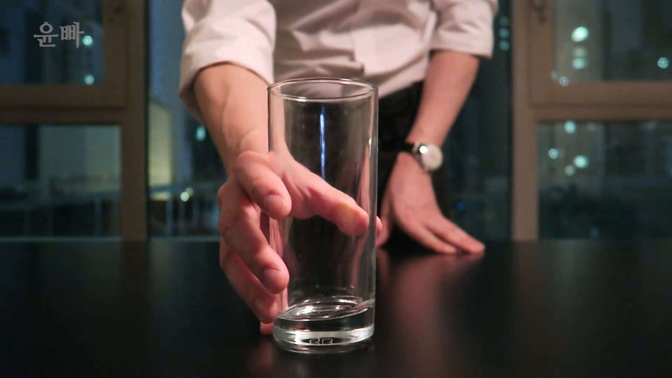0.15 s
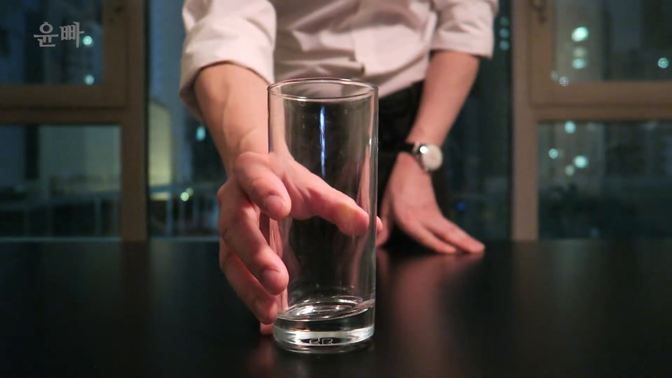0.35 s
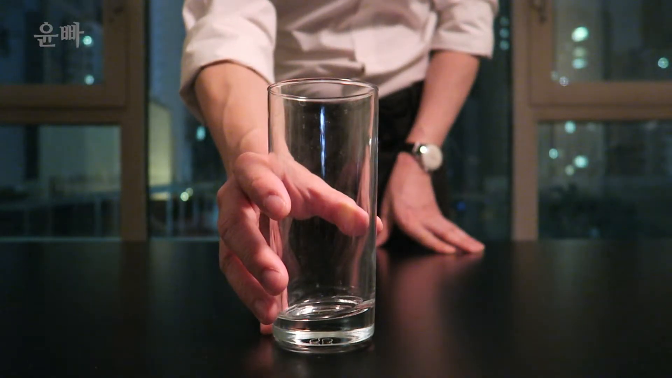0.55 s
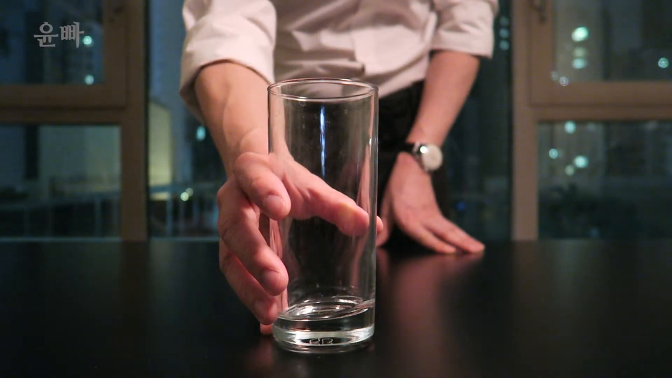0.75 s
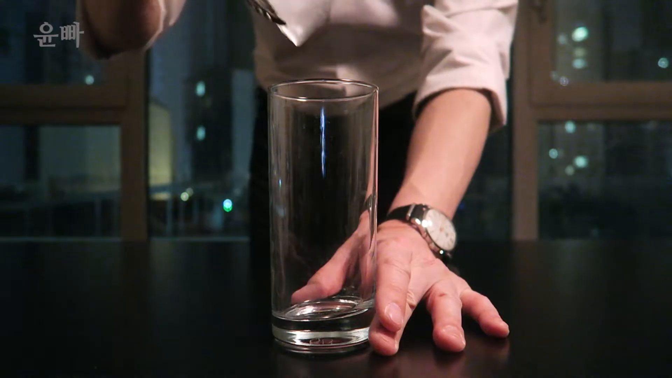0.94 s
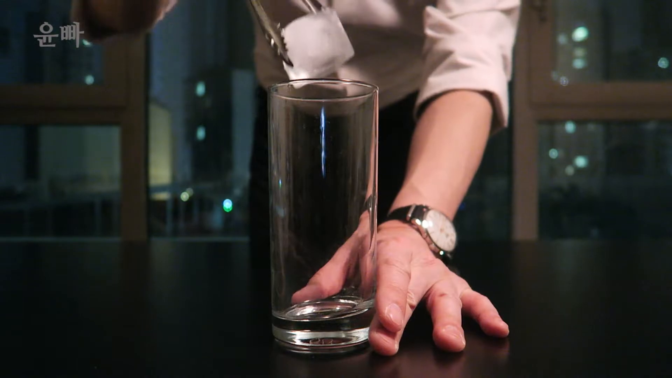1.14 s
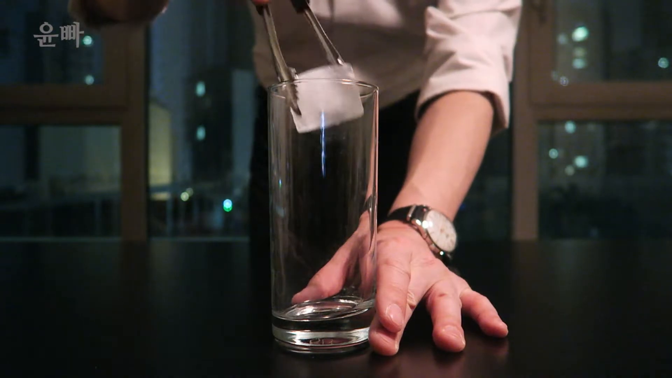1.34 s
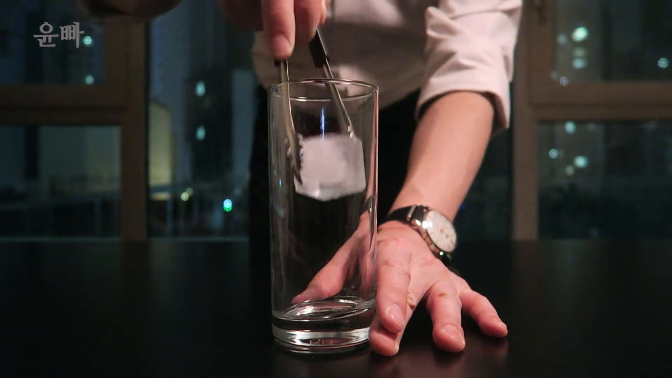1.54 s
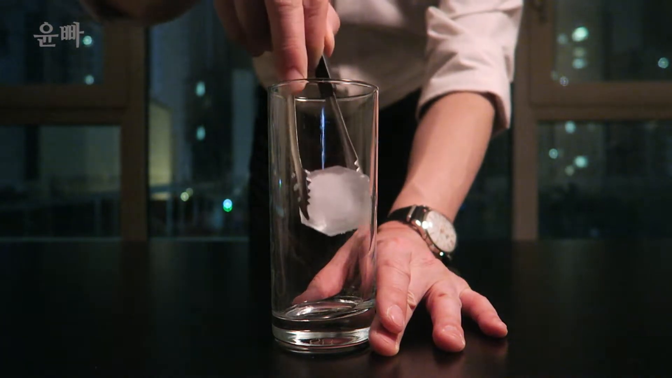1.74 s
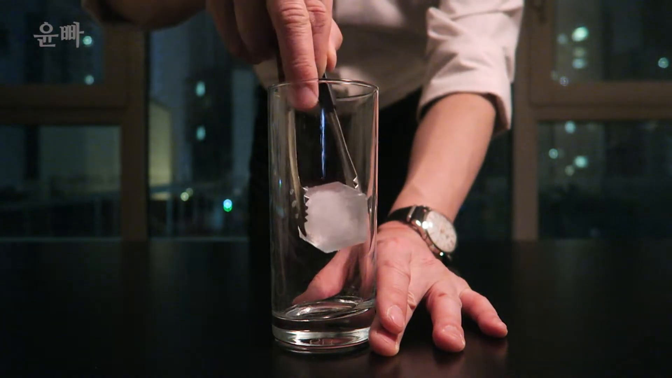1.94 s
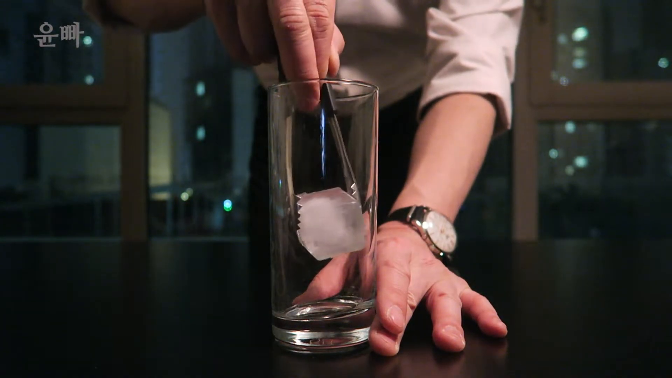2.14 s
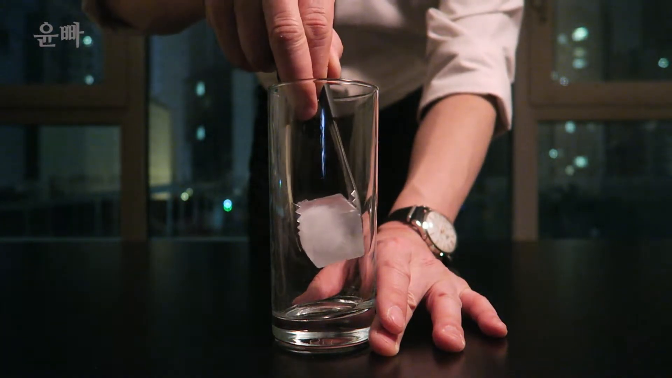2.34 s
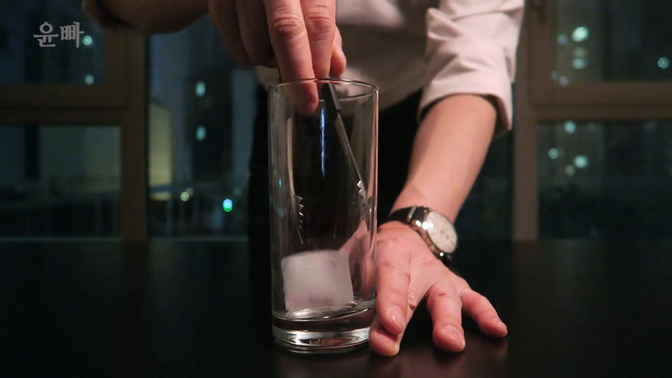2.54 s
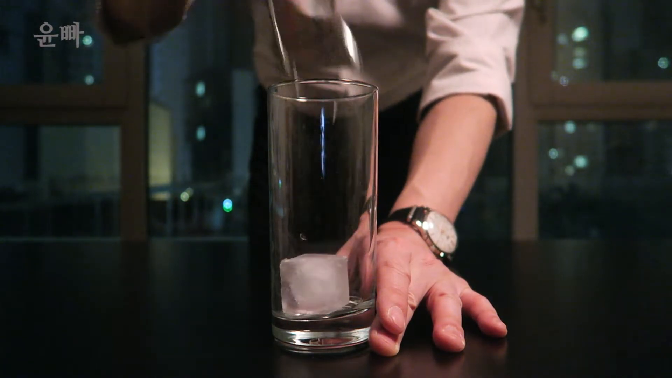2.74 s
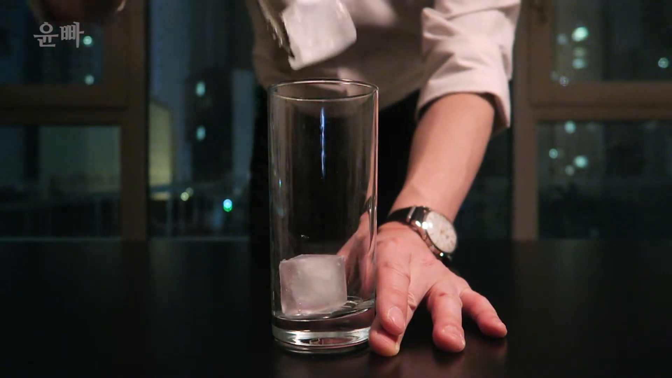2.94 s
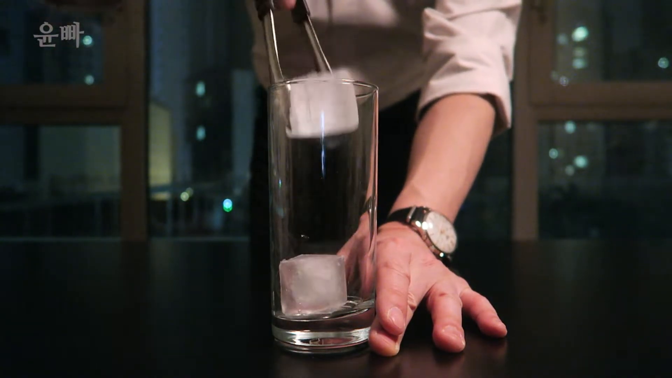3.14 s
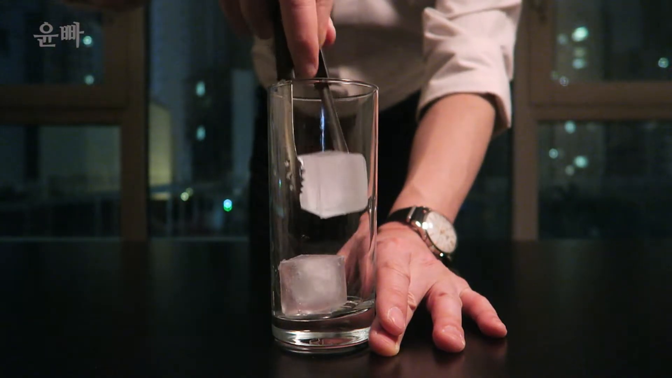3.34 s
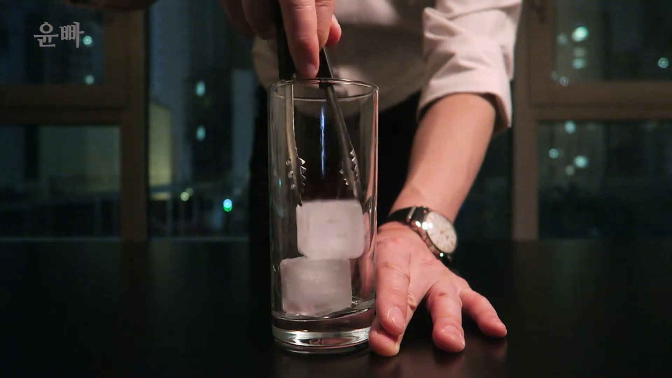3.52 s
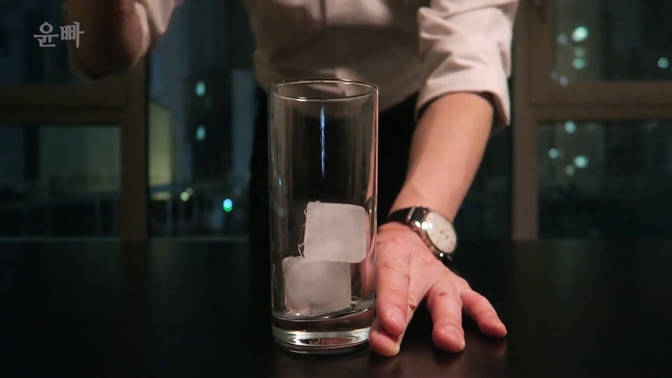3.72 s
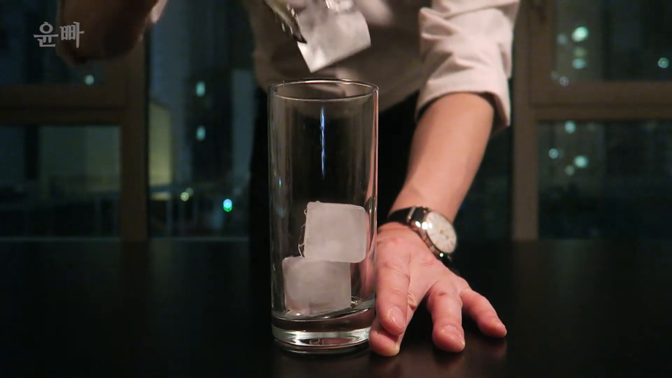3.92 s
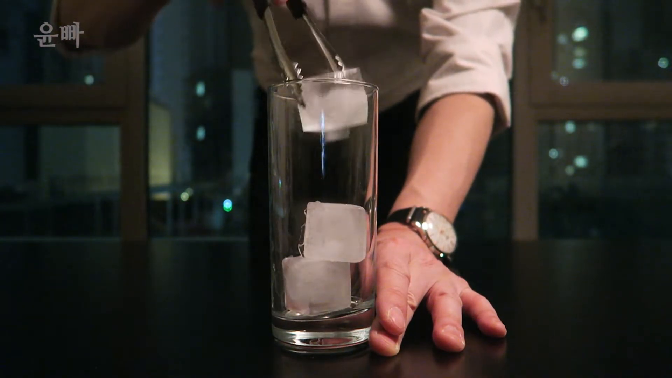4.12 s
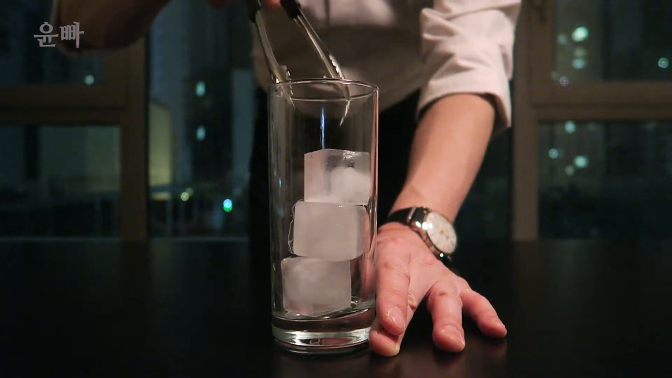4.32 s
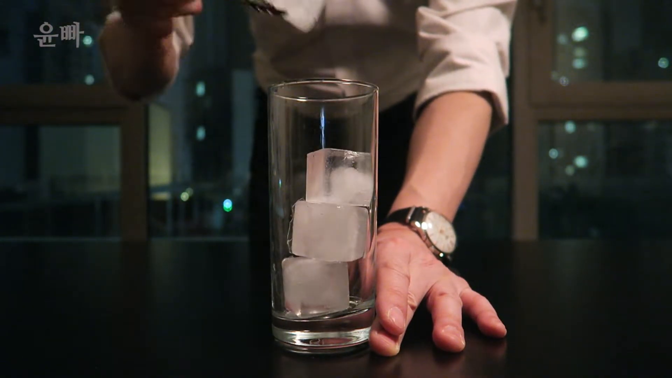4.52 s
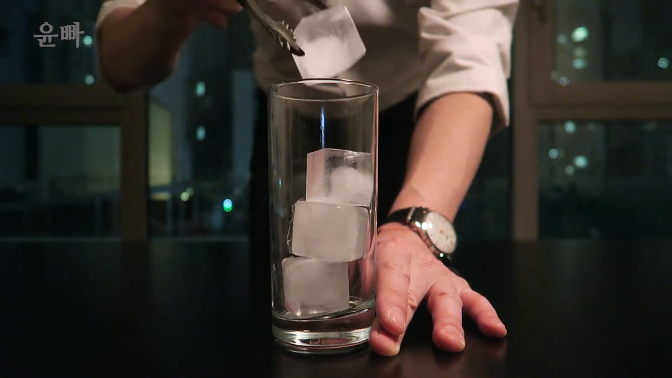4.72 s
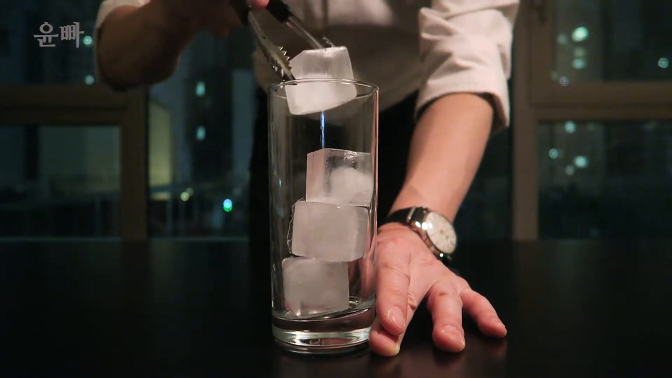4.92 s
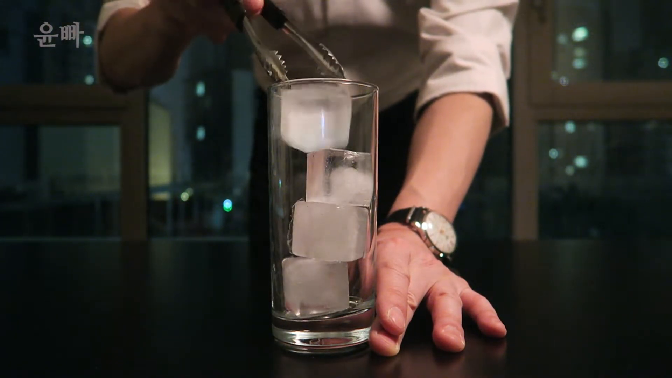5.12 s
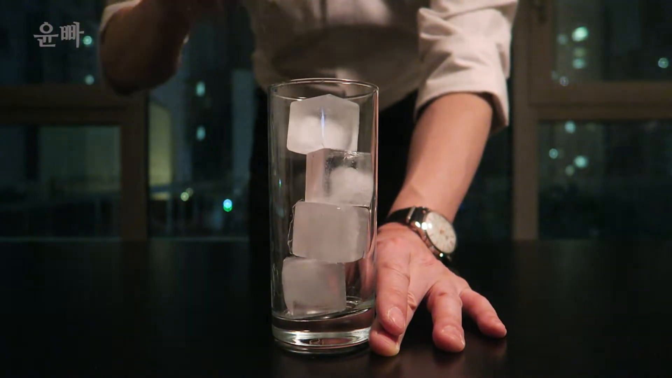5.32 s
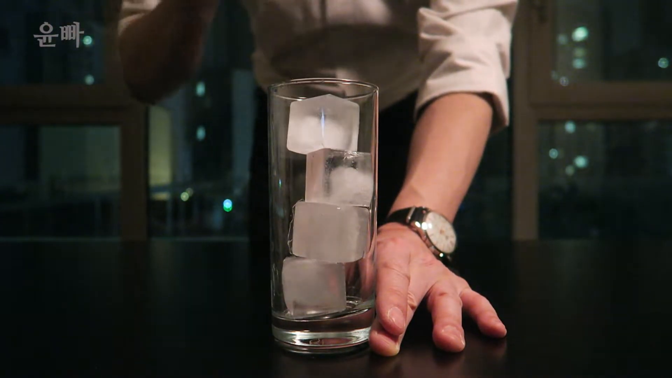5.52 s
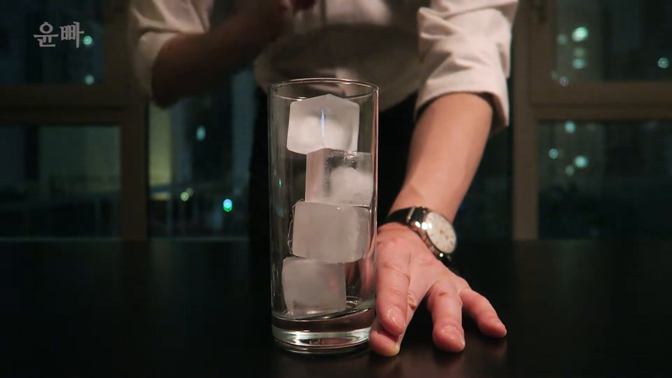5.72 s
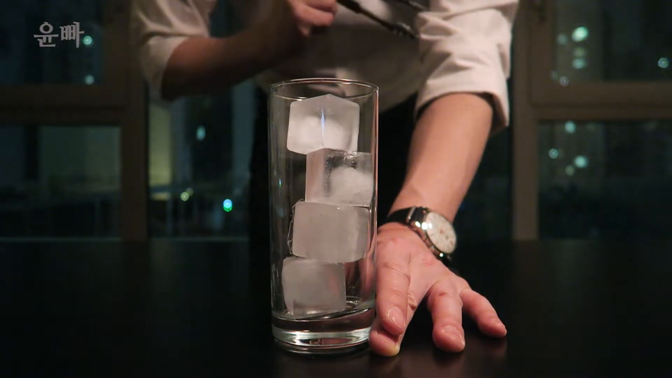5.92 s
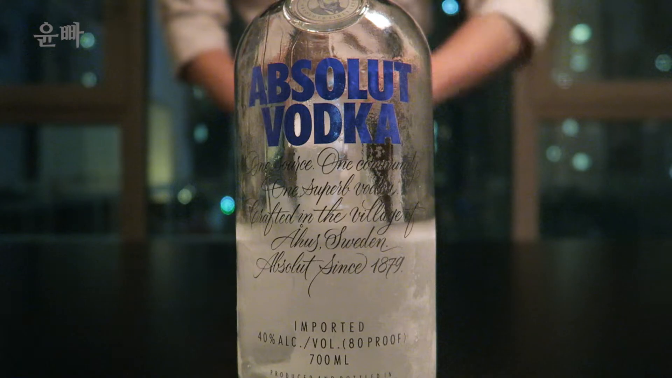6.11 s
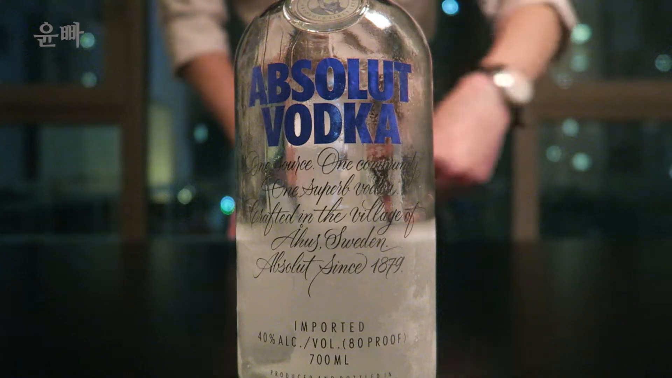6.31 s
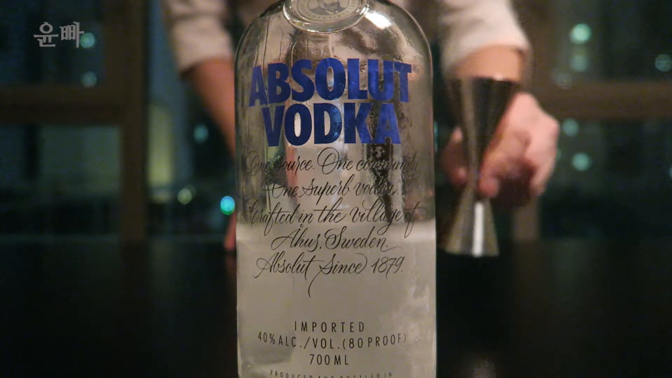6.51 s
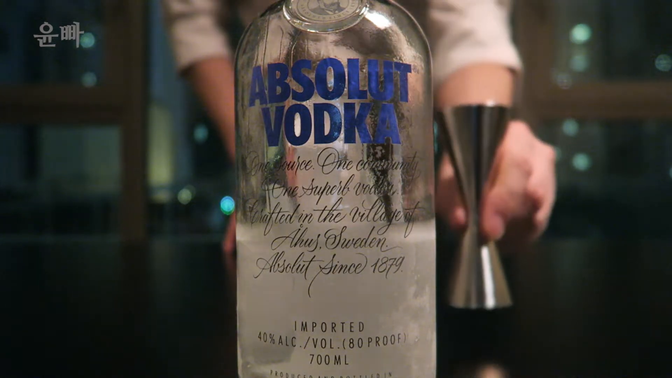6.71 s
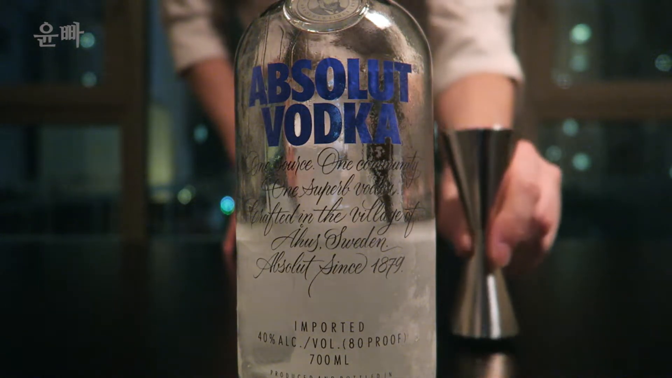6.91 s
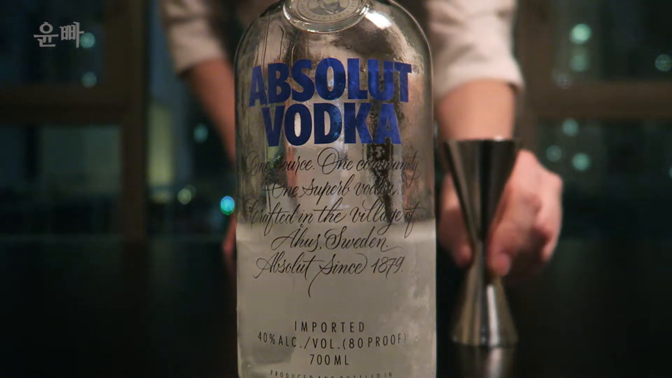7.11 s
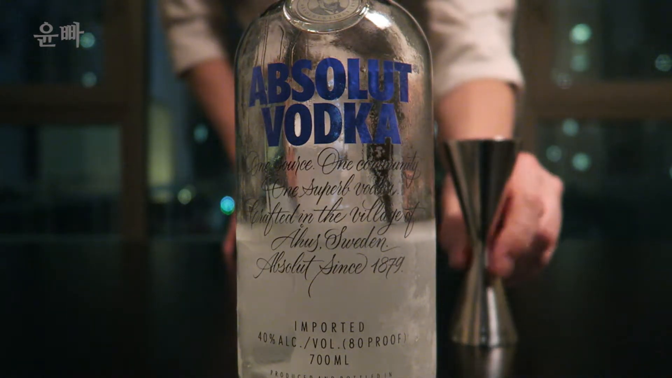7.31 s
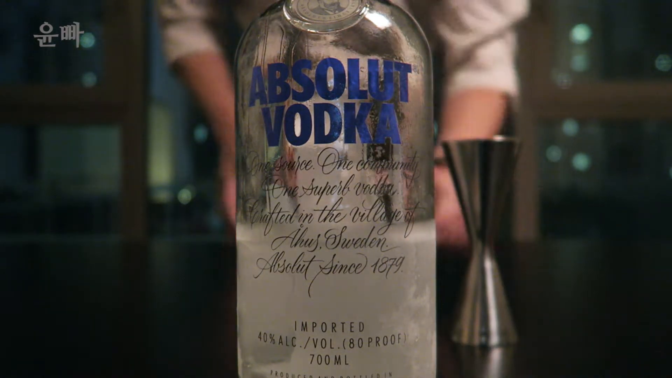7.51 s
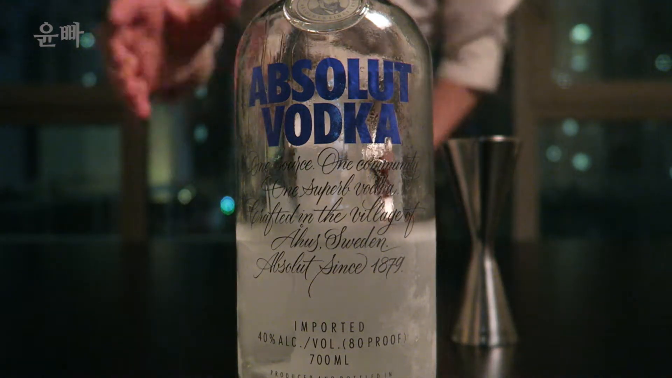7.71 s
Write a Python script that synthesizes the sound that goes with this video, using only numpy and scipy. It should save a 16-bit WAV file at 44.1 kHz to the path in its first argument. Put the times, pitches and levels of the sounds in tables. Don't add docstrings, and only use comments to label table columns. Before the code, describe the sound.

Ice cubes drop one by one into a tall glass, clinking, knocking and rattling over a low refrigerator hum, then a metal cup taps the table.

```python
import sys
import numpy as np
from scipy import signal
from scipy.io import wavfile
from scipy.ndimage import uniform_filter1d

SR = 44100
rng = np.random.default_rng(int(sys.argv[2]) if len(sys.argv) > 2 else 0)


def volts(x):
    e = np.asarray(x, float) / 20
    return 10 ** e


def wrap_up_sound(samples):
    columns = np.atleast_2d(samples).T
    tamed = np.clip(columns, -1, 1)
    steps = np.round(tamed * 32767).astype(np.int16)
    wavfile.write(sys.argv[1], SR, steps)


N = 342075

# start in seconds, hum pitch in Hz, hum level in dB.
SHOTS = [
    (0, 70.1, -43),
    (0.824, 70.05, -42),
    (2.838, 70.4, -43),
    (3.773, 69.8, -44),
    (4.488, 69.3, -43),
    (6.066, 77.34, -43),
]
# frequency in Hz, side minus mid in dB.
AIR_SIDE = [(60, -36), (110, -30.5), (200, 7), (380, 8.5), (700, 5.5), (1290, 4), (2380, 1.5), (4400, 0.5),
            (8120, 2), (15000, -3.5)]
# start in seconds, air column pitch in Hz,
# snap over crack in dB, rim over third wall pair in dB, tongs over third wall pair in dB.
STACK = [(0, 706, -7, -26, -23), (2.4, 740, -11, -26, -16), (2.56, 746, -8, -14, -1),
         (2.63, 749, -21, -19.5, -9.5), (3.1, 720, -4, -6.5, -11), (3.48, 841, -26, -28, -23.5),
         (4.1, 837, -13.5, -32, -22), (4.27, 807, -6, -13, -20), (4.31, 806, -22, -18.5, -22.5),
         (4.36, 840, 2, -5.5, -17), (4.4, 810, -10, -11, -22), (5.1, 732, -26, -17.5, -17),
         (5.5, 748, -17, -18, -24.5)]
# start in seconds,
# thump level in dB, clack level in dB, crack level in dB, clack pitch in Hz.
KNOCKS = [(1.738, -34, -33.5, -46, 2340), (1.7465, -25.5, -47, -59, 1800), (2.446, -73, -64.5, -63, 3600),
          (2.486, -33.5, -45, -60, 3050), (2.51, -37.5, -38.5, -57, 3600), (2.538, -25.5, -27.5, -44, 3800),
          (2.565, 0, -16.5, -35, 3450), (2.579, -8, -12, -36.5, 3700), (2.64, -5.5, -12.5, -59, 3330),
          (2.706, -21.5, -28, -54, 3300), (3.166, -29, -38.5, -40, 2960), (3.185, -18.5, -33.5, -38, 2600),
          (3.497, -3, -3.5, -17.5, 3400), (3.508, -16.5, -27, -34, 2970), (3.54, -31.5, -38.5, -43.5, 3000),
          (3.587, -15, -29, -56, 2980), (3.624, -15, -31.5, -54.5, 3050), (3.652, -30, -18.5, -39.5, 3260),
          (4.2521, -41.5, -37.5, -47, 3080), (4.258, 0, 4.5, -9, 3414), (4.273, -4, -31.5, -31, 3300),
          (4.3, -11.5, -25, -48.5, 3300), (4.286, -15.5, -20.5, -46, 3350), (4.322, -11.5, -16, -48, 3300),
          (4.365, -28.5, -22, -58, 3020), (5.161, -27, -42, -51, 2890), (5.182, -1.5, -24, -38, 2870),
          (5.204, -7.5, -33, -35, 2800), (5.209, -8.5, -22.5, -44, 2800), (5.2245, -25, -19.5, -29.5, 2720),
          (5.2655, -22.5, -25, -49, 3770), (5.292, -24.5, -35, -47, 2780), (5.315, -29, -31, -60, 2800),
          (5.361, -31, -43, -66, 3040)]
# start in seconds, thump level in dB,
# clack level in dB, clack pitch in Hz.
TICKS = [(.01, -43.5, -71, 2940), (2.133, -73, -57, 2720), (3.4539, -73.5, -50.5, 2825),
         (4.2, -55, -50, 2926), (5.147, -60.5, -60.5, 2930), (5.671, -67, -54, 3100),
         (5.8105, -47.5, -43, 2500), (7.015, -65.5, -49, 1910), (7.363, -47, -68, 2098),
         (7.386, -49.5, -70, 2140)]


def read(points, hz):
    f, value = np.transpose(points)
    return np.interp(np.log(hz + 1), np.log(f + 1), value)


def evened(x):
    return x / np.sqrt(np.mean(x ** 2) + 1e-20)


def smoothed_twice(x, span, axis=-1, second_span=None, second_axis=-1):
    return uniform_filter1d(uniform_filter1d(x, span, axis), second_span or span, second_axis)


def add(mix, s, sound):
    part = mix[round(s * SR):][:len(sound)]
    part += sound[:len(part)]


def shot_edges():
    starts = [round(row[0] * SR) for row in SHOTS]
    return list(zip(starts, starts[1:] + [N]))


def noise(colour, side, patchy_db):
    hz = np.fft.rfftfreq(2048, 1 / SR)
    a, b, c, d, patches = rng.standard_normal((N // 512 + 5, 1025, 5)).T
    patches = evened(smoothed_twice(patches, 20, 0, 6, 1))
    mid = a + 1j * b
    wide = (c + 1j * d) * volts(read(side, hz))[:, None]
    gain = volts(read(colour, hz)[:, None] + patchy_db * patches)
    out = signal.istft(np.array([mid + wide, mid - wide]) * gain, nperseg=2048, noverlap=1536)[1][:, :N]
    return out / np.sqrt(np.mean(out.mean(0) ** 2))


def blow(modes, factor, turns, rise_s):
    t = np.arange(8000) / SR
    out = np.zeros(len(t))
    for (hz, db, t60), turn in zip(modes, turns):
        out += volts(db - 60 * t / t60) * np.sin(2 * np.pi * (hz * factor * t + turn))
    out = out * np.sin(np.pi / 2 * np.minimum(t / rise_s, 1)) ** 2
    return out / abs(out).max()


def causal(colour):
    hz = abs(np.fft.fftfreq(4096, 1 / SR))
    log_gain = np.log(volts(np.maximum(read(colour, hz), -80)))
    out = np.fft.ifft(np.exp(np.conj(signal.hilbert(log_gain)))).real[:2048]
    return out / abs(out).max()


def room_air():
    # frequency in Hz, density in dB per Hz.
    air = [(12, -55.5), (20, -20), (44, -27.5), (81, -18.5), (101, -23), (119, -16), (326, -28.5),
           (407, -22.5), (673, -27.5), (1180, -31.5), (1350, -33.5), (7420, -49), (12600, -58.5),
           (14500, -56), (15800, -95.5)]
    return volts(-55) * noise(air, AIR_SIDE, 0.23)


def hum():
    # frequency in Hz, bandwidth in Hz, level in dB.
    drone = [
        [(137.3, 42, -62.5), (213, 7.4, -59.5), (275, 8.6, -60.5), (346, 5, -65.5), (408, 6.3, -62),
         (443, 4.9, -68), (570, 10, -69.5)],
        [(144, 6.4, -60), (247, 72, -54.5), (317, 2.6, -64.5), (372, 6.8, -85.5), (456, 21, -61)],
    ]
    out, t = np.zeros(N), np.arange(N) / SR
    wobble = evened(smoothed_twice(rng.standard_normal(N), 2000))
    for (a, b), (_, hz, db) in zip(shot_edges(), SHOTS):
        tone = np.sin(2 * np.pi * (hz * t[a:b] + rng.random()))
        out[a:b] = volts(db + 5.0 + 0.32 * wobble[a:b]) * tone
    out = uniform_filter1d(out, size=40)
    first, last = shot_edges()[0][1], shot_edges()[-1][0]
    early = t[:first]
    second_motor = volts(-54 - 3.6 * early) * np.sin(2 * np.pi * 80.0 * early)
    out[:first] += signal.windows.tukey(first, .02) * second_motor
    for lines, part in zip(drone, (slice(0, last), slice(last, N))):
        for hz, width, db in lines:
            r = np.exp(-np.pi * width / SR)
            slow = signal.lfilter([1], [1, -r], rng.standard_normal((2, N)))
            line = slow[0] * np.cos(2 * np.pi * hz * t) + slow[1] * np.sin(2 * np.pi * hz * t)
            out[part] += volts(db) * evened(line)[part]
    return out


def moans():
    # time in seconds, pitch in Hz, level in dB.
    glides = [
        [(1.0, 212, -66), (1.016, 209.7, -61), (1.496, 220.3, -46.5), (1.794, 226.4, -50), (1.912, 219, -44),
         (2.45, 217.7, -61)],
        [(7.3, 225.1, -58), (7.66, 236.8, -54), (7.702, 247, -67), (7.716, 244, -62), (7.748, 244, -57),
         (7.75, 240.1, -70.5)],
    ]
    out = np.zeros(N)
    for rows in glides:
        s, hz, db = np.transpose(rows)
        t = np.arange(s[0], s[-1], 1 / SR)
        tone = np.sin(2 * np.pi * np.cumsum(np.interp(t, s, hz)) / SR)
        add(out, s[0], volts(np.interp(t, s, db) + 4.0) * tone * signal.windows.tukey(len(t), .1))
    return out


def sleeve():
    # centre in seconds, half length in seconds, level in dB.
    reaches = [(0, .2, -72), (0.966, 0.22, -65), (1.51, 0.38, -65), (2.508, 0.38, -74.5),
               (3.247, 0.56, -65.5), (4.165, .2, -74.5), (5.097, 0.23, -75.5), (5.773, 0.17, -61.5),
               (6.181, 0.14, -62), (6.556, 0.16, -59), (6.954, 0.16, -69), (7.667, 0.22, -56.5)]
    # frequency in Hz, level in dB.
    cloth = [(300, -27), (800, 0.5), (2000, 3.5), (3500, 4), (6000, -9.5), (12000, -15.5), (16000, -15)]
    t = np.arange(N) / SR
    swell = sum(volts(db) * np.exp(-((t - s) / half_s) ** 2) for s, half_s, db in reaches)
    return swell * noise(cloth, AIR_SIDE, 2.1)


def room_tails():
    # frequency in Hz, t60 in seconds.
    decay = [(150, 0.32), (500, 0.37), (1500, 0.32), (4000, 0.39), (8000, 0.29), (15000, 0.084)]
    # frequency in Hz, side minus mid in dB.
    spread = [(150, -17.5), (600, -20.5), (2000, -16), (6000, -8.5), (15000, 4.5)]
    taps = np.zeros((2, SR))
    at = np.arange(200, SR - 20, 20) + rng.integers(0, 20, (2, (SR - 201) // 20))
    np.put_along_axis(taps, at, rng.choice([-1., 1.], at.shape), 1)
    hz, t, z = signal.stft(taps, SR, nperseg=256)
    z = z * volts(-60 * t / read(decay, hz)[:, None])
    z[1] *= volts(read(spread, hz))[:, None]
    mid, side = signal.istft(z, SR, nperseg=256)[1]
    mid = mid * (1 + 0.66 * np.exp(-np.arange(len(mid)) / (0.02 * SR)))
    return np.array([mid + side, mid - side]) / np.linalg.norm(mid)


def cup_landing(out, less_roomy, close):
    # time in seconds, level in dB.
    landing = [
        (7.025, 0),
    ]
    # frequency in Hz, level in dB, t60 in seconds.
    cup_body = [(199, -18.5, 0.11), (555.5, -6, 0.049), (748, -2, 0.069), (1000, -0.5, 0.082),
                (1198, -7.5, 0.017), (1522, -3, 0.019), (1855, -5.5, 0.033), (2140, 0, 0.013),
                (2443, -12, 0.048), (2930, -11.5, 0.016), (3122, -12, 0.043), (3440, -8.5, 0.018),
                (4030, -29, .008), (4900, -42, 0.0085)]
    # frequency in Hz, level in dB, t60 in seconds.
    cup_rim = [(5330, 4.5, 0.018), (5600, -5.5, 0.0089), (6530, 0, .01), (7600, -14.5, 0.012),
               (8460, -15, .022), (10300, -17, .025), (11500, -19.5, .008), (13500, -12.5, .022),
               (14900, -17.5, .008)]
    # frequency in Hz, level in dB.
    cup_edge = [(1200, -29.5), (2000, -3.5), (3000, 0.5), (4500, -1), (6500, -13), (9000, -26),
                (13000, -31), (16000, -36.5)]
    # frequency in Hz, level in dB.
    table_top = [(120, -15.5), (250, -7.5), (450, -25), (750, 3.5), (1100, 2.5), (1550, 5), (2100, -0.5),
                 (3100, -14), (4000, -22), (6000, -39), (9000, -56.5), (15000, -77.5)]
    # frequency in Hz, level in dB, t60 in seconds.
    cup_ring = (2040, -52, 1.0)
    s, db = landing[0]
    for delay_s, rim_db in ((.0006, 2), (.0031, -7.5), (.0092, -13.5)):
        add(out, s + delay_s, volts(db + rim_db) * causal(table_top))
    add(close, s + .0005, volts(db - 9.5) * causal(cup_edge))
    add(less_roomy, s, volts(db + 2.0) * blow(cup_body, 0.98, rng.random(20), 0.00028))
    add(close, s, volts(db - 27.5) * blow(cup_rim, 0.99, rng.random(20), 0.0002))
    t = np.arange(SR) / SR
    hz, ring_db, t60 = cup_ring
    shimmer = 1 + 0.5 * evened(uniform_filter1d(rng.standard_normal(SR), size=600))
    add(out, s, volts(ring_db - 60 * t / t60) * np.sin(2 * np.pi * hz * t) * shimmer)


def ice_spray(out):
    # time in seconds, level in dB.
    sprays = [
        (2.5665, -28),
        (2.5805, -21),
        (3.4985, -36.5),
        (4.2595, -10),
        (4.266, -20),
        (4.278, -30),
        (5.1835, -32),
        (5.226, -31),
        (7.0256, -24.5),
        (7.029, -31),
    ]
    # frequency in Hz, level in dB.
    spray_colour = [(1500, -30), (3800, -1), (5500, 0), (8000, -1.5), (10500, -3), (12500, -14.5),
                    (16000, -22)]
    spray = causal(spray_colour)
    for s, db in sprays:
        add(out, s, volts(db) * spray)


def stack_at(s):
    rows = np.array(STACK)
    return rows[np.searchsorted(rows[:, 0], s) - 1, 1:].T


def all_blows():
    crack_db = -15.5
    ticks = [(s, thump_db, clack_db, clack_db + crack_db, hz) for s, thump_db, clack_db, hz in TICKS]
    rows = np.array(KNOCKS + ticks)
    column_hz, snap_db = stack_at(rows[:, 0])[:2]
    return np.column_stack([rows, rows[:, 3] + snap_db, column_hz])


def ice_blows(out, less_roomy, close):
    # frequency in Hz, level in dB, t60 in seconds.
    thump_modes = [(186, -13.5, 0.083), (244, -18, 0.1), (351, -13.5, 0.038), (432, -8.5, 0.035),
                   (487, -4.5, 0.045), (540, -1.5, 0.043), (632, -1.5, 0.038), (930, -9, 0.045),
                   (1057, -17.5, 0.0075)]
    # share of the clack pitch, level in dB, t60 in seconds.
    clack_modes = [(.71, -10, 0.015), (.78, -8, 0.014), (.89, -7.5, 0.01), (.94, -9, 0.018),
                   (1.001, -0.5, 0.014), (1.12, -10, 0.009)]
    # frequency in Hz, level in dB, t60 in seconds.
    crack_modes = [(4500, 1, 0.0042), (4870, 1, 0.0031), (5670, -2.5, 0.0059), (6400, 0, 0.004)]
    # frequency in Hz, level in dB, t60 in seconds.
    snap_modes = [(7520, -4, 0.008), (8260, -3, 0.0017), (10000, -3, 0.0044), (13000, -6.5, 0.0027)]
    # frequency in Hz, level in dB, t60 in seconds.
    base_modes = [(1214, -3.5, 0.048), (1320, -5.5, 0.037), (1450, -10.5, 0.0036), (1663, 4.5, 0.011),
                  (1850, -6.5, 0.016)]
    # share of the column pitch, level in dB, t60 in seconds.
    overtones = [(.505, -3, .05), (1.54, -1, .02), (2.02, 0.5, .02)]
    # frequency in Hz, level in dB.
    ice_colour = [(150, -25.5), (400, -7), (800, -4.5), (1500, -1.5), (2500, -1.5), (4500, -17),
                  (8000, -29), (15000, -56)]
    # start in seconds, air column level in dB,
    # its overtones in dB, upper thump in dB, base in dB, crunch in dB.
    body = [(0, 4.5, -34, -1.5, 4.5, 0.5), (2.4, 1, -9.5, 0, 5, 4.5), (2.63, -0.5, -12.5, -2.5, 0.5, -1.5),
            (3.1, 2.5, -19, -4, -6, -1.5), (3.48, -0.5, -0.5, -9.5, 0, -3), (3.503, 5, -6, -8.5, 0, -1.5),
            (3.56, 1.5, -1.5, -11.5, -14, 3), (4.1, -2, -8, -4.5, -1.5, -4.5),
            (4.27, 3.5, -7.5, -1.5, -3.5, 2), (5.1, 0.5, -5.5, -3.5, -0.5, 1),
            (5.22, 6, -12.5, -2, -4, -1.5), (5.5, 2, -12, 6, -15, 7)]
    crunch = causal(ice_colour)
    for s, thump_db, clack_db, crack_db, clack_hz, snap_db, column_hz in all_blows():
        turns = rng.random(20)
        column_db, over_db, upper_db, base_db, crunch_db = [row for row in body if row[0] < s][-1][1:]
        thump = [(hz, db + upper_db * (hz > 500), t60) for hz, db, t60 in thump_modes]
        column = [(column_hz, 0, 0.03)]
        s = s + .0015
        soft = volts(-.25 * thump_db)

        level = volts(thump_db + 4.5 + 0.86 * upper_db)
        add(out, s, level * blow(thump, 0.98, turns / 8, 0.00054 * soft))
        level = volts(0.76 * thump_db + 0.26 * clack_db + 5.0 + column_db)
        add(less_roomy, s, level * blow(column, 1, turns / 8, 0.00099 * soft))
        level = volts(0.84 * thump_db + 0.47 * clack_db + 4.0 + over_db)
        add(out, s, level * blow(overtones, column_hz, turns / 8, 0.0006 * soft))
        level = volts((thump_db + clack_db) / 2 + 1.5 + base_db)
        add(out, s, level * blow(base_modes, .99 + 0.015 * turns[-4], turns, 0.00024 * soft))
        add(out, s, volts(0.54 * thump_db + 0.33 * clack_db + 1.0 + crunch_db) * crunch)
        add(less_roomy, s, volts(clack_db + 5.0) * blow(clack_modes, clack_hz, turns, 0.00053 * soft))
        crack = blow(crack_modes, .94 + 0.23 * turns[-2], turns, 0.00069 * soft)
        add(out, s, volts(crack_db + 6.5) * crack)
        snap = blow(snap_modes, 0.84 + 0.038 * turns[-3], turns, 0.0019)
        add(close, s, volts(snap_db + 15.5) * snap)


def knocks():
    out, less_roomy, close = np.zeros((3, N))
    ice_blows(out, less_roomy, close)
    ice_spray(out)
    cup_landing(out, less_roomy, close)
    direct = out + less_roomy + close
    room_feed = out + volts(-6) * less_roomy + volts(-9.5) * close
    high_pass = signal.butter(2, 110., "high", fs=SR, output="sos")
    return signal.sosfilt(high_pass, [direct, room_feed])


def all_rings():
    # start in seconds, oval mode level in dB, second mode in dB, third pair in dB, fourth mode in dB.
    clinks = [(1.74, -12.5, -32, -36.5, -39), (1.7467, -30.5, -41, -37.5, -45), (1.772, -39, -53, -53, -52),
              (1.8135, -38.5, -53, -57, -61), (1.8986, -59, -66, -69, -80), (1.96, -58.5, -70, -84, -88),
              (2.4885, -17.5, -49, -37.5, -42), (2.5134, -22, -45, -41, -42),
              (2.5418, -13, -35, -26.5, -29.5), (2.5684, -13, -45, -37.5, -46),
              (2.598, -20.5, -49, -39, -61.5), (2.642, -17, -54, -39, -60), (2.677, -20.5, -60, -52, -69),
              (3.169, -21.5, -40, -27, -34.5), (3.179, -21, -45.5, -31.5, -45),
              (3.1853, -22.5, -44, -33, -27), (3.226, -25, -40, -48.5, -46), (3.2418, -45, -47, -50.5, -48),
              (3.272, -52, -55, -49.5, -47), (3.31, -55, -61.5, -59, -57), (3.4976, -11, -25.5, -31, -44),
              (3.509, -2.5, -28, -17, -28), (3.539, -8.5, -35, -27, -43), (3.6, -15, -45, -39.5, -49),
              (3.6534, -10.5, -29.5, -34, -36.5),
              (4.2623, -13, -24, -26.5, -33), (4.2886, -13.5, -16.5, -36.5, -42),
               (4.33, -20.5, -22.5, -40.5, -48), (4.366, -15.5, -29, -34, -44),
               (4.385, -44.5, -30, -50, -48), (4.394, -24.5, -30.5, -50, -67), (4.41, -24, -33, -51, -57),
               (4.4388, -48, -38, -51, -60), (4.472, -36.5, -38.5, -54, -77.5),
               (5.1602, -18.5, -36, -42, -50.5), (5.169, -29, -36, -42, -50.5),
               (5.1868, -16.5, -33, -45.5, -51), (5.192, -17.5, -21, -44, -46),
               (5.199, -29, -20.5, -50, -41), (5.2245, -9, -17.5, -33, -30), (5.258, -16, -22.5, -36, -68),
               (5.2812, -42, -29, -40.5, -46), (5.3034, -30, -28.5, -55, -65), (5.32, -27, -30.5, -50, -64),
               (5.34, -33, -34.5, -60, -53), (5.3625, -27, -42, -47, -60), (5.385, -34, -43, -61.5, -65),
               (5.404, -58, -48, -66, -71), (5.43, -47.5, -57, -69, -78.5),
               (5.53, -59.5, -76, -84.5, -88.5)]
    rows = np.array(clinks)
    rim_db, tongs_db = stack_at(rows[:, 0])[2:]
    return np.column_stack([rows, rows[:, 3] + rim_db, rows[:, 3] + tongs_db])


def wall():
    # frequency in Hz, level in dB, t60 in seconds, split of the twin in Hz.
    wall_modes = [
        [(2082, -4, 0.69, 4.7)],
        [(3950, -5, 0.44, 8.8)],
        [(6740, -2.5, 0.08, 78), (6930, -7.5, 0.15, 39)],
        [(7720, -3, 0.11, 4)],
        [(10880, -4.5, 0.11, 100), (10500, -6.5, 0.2, 45), (14590, -10.5, .1, 70), (15250, -13.5, .15, 66)],
        [(11980, -4, 0.2, 28), (12600, -9.5, .17, 31), (13580, -3.5, .16, 45), (14270, -15, .12, 30)],
    ]
    side_db = [-17, -15.5, -11.5, -17.5, -8, -12]
    resting_db, flutter_db, flutter_s = -33, 6, 0.003
    rows, t = all_rings(), np.arange(N) / SR
    last = np.maximum(np.searchsorted(rows[:, 0], t) - 1, 0)
    since = t - rows[last, 0]
    shot_starts = np.array(SHOTS)[:, 0]
    same_shot = np.searchsorted(shot_starts, t) == np.searchsorted(shot_starts, rows[last, 0])
    chance = rng.random((len(rows), 12, 3))
    rattle = smoothed_twice(rng.standard_normal((len(wall_modes), N)), round(flutter_s * SR))
    rattle = np.clip(evened(rattle), -3, 1)
    out = np.zeros((2, N))
    for column, modes in enumerate(wall_modes):
        struck = np.diff(rows[:, 1 + column], prepend=0) > 0
        resting = (rows[last, 1] < resting_db) | (column > 3)
        free = (column != 1) | (t < STACK[1][0])
        flutter = volts(flutter_db * rattle[column] * resting * free)
        side_turn = chance[0, column:, 0]
        for k, (hz, db, t60, split_hz) in enumerate(modes):
            turn = np.cumsum(struck * chance[:, column + k, 2])[last]
            twin_turn, spot = chance[last, column + k, :2].T
            spot_db = 2.5 * (spot - 1.0) * (len(modes) > 1)
            level = volts(rows[last, 1 + column] + db + 4.0 + spot_db - 60 * abs(since) / t60) * flutter
            beat = 1 + (0.054 + 0.11 * column) * np.exp(2j * np.pi * (split_hz * t + twin_turn))
            envelope = level * beat * np.exp(2j * np.pi * turn) * (since > 0)
            tone = uniform_filter1d(envelope, size=40) * np.exp(2j * np.pi * hz * t)
            turned = tone * np.exp(2j * np.pi * side_turn[k])
            out += [tone.imag, volts(side_db[column]) * turned.imag]
    return out * ((since > 0) & same_shot)


def scene():
    ring, ring_side = wall()
    hits, spread = knocks()
    side = ring_side + volts(-12) * np.diff(hits, prepend=0)
    direct = ring + hits + np.array([side, -side])
    send = volts(-19) * ring + volts(-1.0) * spread
    out = np.zeros((2, N))
    for a, b in shot_edges():
        fade = np.minimum(np.arange(b - a, 0, -1) / 28, 1)
        tail = signal.fftconvolve(send[None, a:b], room_tails(), axes=1)[:, :b - a]
        out[:, a:b] = fade * (direct[:, a:b] + tail)
    return out + room_air() + sleeve() + hum() + moans()


def band_limit(x):
    return signal.sosfilt(signal.butter(12, 15910, fs=SR, output="sos"), x)


def record(dry):
    gain_db = np.zeros(N)
    lag = np.exp(-1 / (0.01 * SR))
    delay = round(0.0064 * SR)
    for a, b in shot_edges():
        power = signal.lfilter([1 - lag], [1, -lag], (dry[:, a:b] ** 2).mean(0))
        power_db = 10 * np.log10(power + 1e-12)
        for share, start_db, db_per_s in ((.4, -8.5, 57.95), (.4, -23.5, 25.43)):
            climb = np.arange(b - a) * db_per_s / SR
            held_db = np.maximum.accumulate(power_db + climb) - climb
            gain_db[a:b] -= share * np.maximum(held_db - start_db, 0)
        late_db = np.pad(gain_db[a:b], (delay, 0))[:b - a]
        gain_db[a:b] = uniform_filter1d(late_db, size=130)
    loud = dry * volts(uniform_filter1d(gain_db, size=40))
    knee = 7.
    clipped = loud / (1 + abs(loud) ** knee) ** (1 / knee)
    dulled = signal.lfilter(*signal.butter(2, 14600, fs=SR), clipped)
    return band_limit(dulled)


dry = scene()
out = record(dry)
wrap_up_sound(out)
```